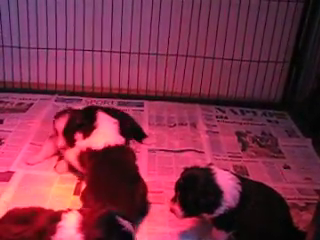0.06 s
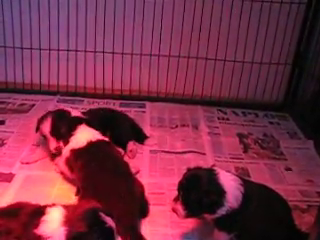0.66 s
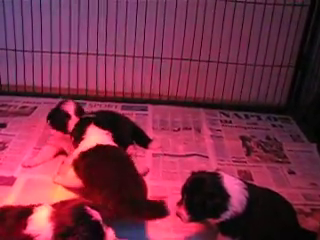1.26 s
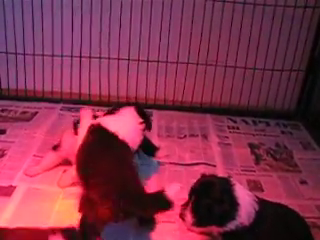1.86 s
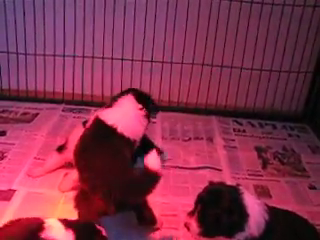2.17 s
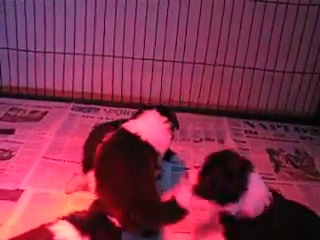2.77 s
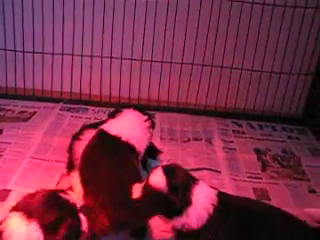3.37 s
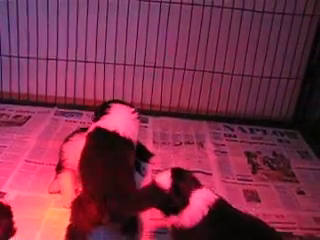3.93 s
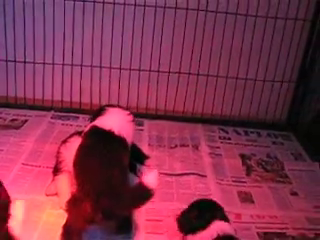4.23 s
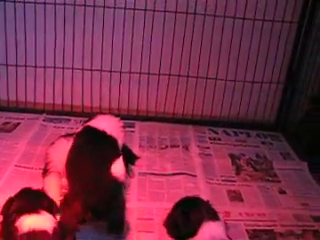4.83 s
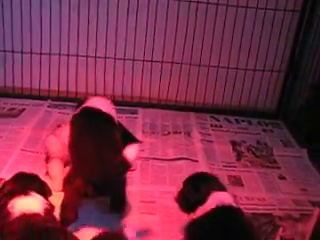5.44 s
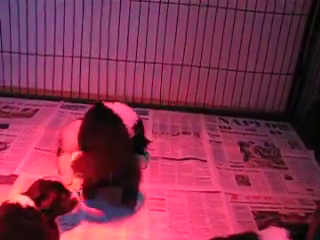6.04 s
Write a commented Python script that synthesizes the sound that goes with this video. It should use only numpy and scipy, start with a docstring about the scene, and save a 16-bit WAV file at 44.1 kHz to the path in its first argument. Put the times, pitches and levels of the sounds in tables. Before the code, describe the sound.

Newspaper rustles and crackles under puppies' paws in a crate, with a few dull tray knocks, a faint fan hum and a thin whine.

```python
"""Newspaper rustles over the faint hum of a fan and the thin whine of a camera: puppies are shuffling
in a wire crate. Sliding friction of paws and bellies makes the hiss, and creases buckle with sharp snaps.
Pads land with dull pats, small mouths smack with a brief cavity resonance, and shifting weight knocks
the tray into damped vibration. A small room adds its reverberation."""
import sys
import numpy as np
from scipy import signal
from scipy.fft import rfft, irfft, next_fast_len
from scipy.io import wavfile
from scipy.ndimage import map_coordinates

SR = 44100
rng = np.random.default_rng(int(sys.argv[2]) if len(sys.argv) > 2 else 0)


def unload_audio(sound):
    """Save the sound as a 16-bit wav file, at the path given as the first command line argument."""
    columns = np.transpose(np.atleast_2d(sound))
    # keep every value between -1 and 1, then stretch to whole-number steps
    steps = np.round(np.clip(columns, -1, 1) * 32767)
    wavfile.write(sys.argv[1], SR, steps.astype(np.int16))


N = 273402

# quick paw skids: (peak time [s], level [dB], rise [s], centre frequency [Hz])
SKIDS = [(0.457, -38.5, 0.01, 4860), (1.186, -39, .013, 7500), (2.025, -33.5, 0.025, 13500),
         (3.002, -25, 0.017, 5070), (3.099, -35, 0.023, 5200), (3.417, -26.5, 0.014, 7000),
         (4.136, -30, 0.032, 4530), (4.292, -34, 0.013, 3430), (4.49, -26, 0.0077, 9300),
         (4.535, -29.5, 0.028, 5340), (4.709, -29, 0.003, 3280), (5.397, -29.5, 0.0035, 3470),
         (5.413, -27, 0.027, 6000), (5.456, -32, 0.021, 6600), (5.745, -27.5, 0.022, 5900),
         (5.84, -32, 0.08, 5560)]
SKID_FALL = 0.96  # fall time over rise time


def amp(db):
    """Amplitude ratio of a level in decibels."""
    return 10 ** (np.asarray(db) / 20)


def unit(x):
    """Normalisation to rms 1."""
    return x / np.sqrt(np.mean(x ** 2) + 1e-20)


def along(points, hz):
    """Interpolation of (frequency [Hz], value) points on a logarithmic frequency axis."""
    freqs, values = np.transpose(points)
    return np.interp(np.log(hz + 1), np.log(freqs + 1), values)


def clock():
    """The time of every sample, in seconds."""
    return np.arange(N) / SR


def curve(points):
    """Linear interpolation of (time [s], value) points at every sample."""
    return np.interp(clock(), *np.transpose(points))


def wobble(rate):
    """Smooth random modulation of rms 1, with rate knots a second."""
    knots = rng.standard_normal(int(N * rate / SR) + 4)
    return unit(map_coordinates(knots, [clock() * rate]))


def fade(t, t60):
    """Exponential decay by 60 dB in t60."""
    return np.exp(-np.log(1000) * t / t60)


def swell(t, rise, fall):
    """Gaussian envelope of a stroke that gathers speed, peaks at t = 0 and slows."""
    return np.exp(-.5 * (t / np.where(t < 0, rise, fall)) ** 2)


def add(track, s, sound):
    """Superposition of a sound on the track from time s."""
    part = track[..., max(round(s * SR), 0):][..., :sound.shape[-1]]
    part += sound[..., :part.shape[-1]]


def filtered(x, response):
    """Linear filtering: the spectrum of x times a frequency response."""
    size = x.shape[-1]
    padded = next_fast_len(size + 2048)
    spectrum = rfft(x, padded) * response(np.fft.rfftfreq(padded, 1 / SR))
    return irfft(spectrum, padded)[..., :size]


def resonance(hz, centre_hz, q):
    """Response of two identical band-pass resonators in cascade."""
    damping = 1j * hz * centre_hz / q
    return (damping / (centre_hz ** 2 - hz ** 2 + damping)) ** 2


def stereo(pair, response):
    """Partial coherence: two independent signals become a coloured pair of rms 1, alike in the bass."""
    # likeness at the two microphone ports: (frequency [Hz], correlation [ratio])
    coherence = [(60, 0.73), (500, 0.83), (1200, 0.72), (2500, 0.49), (5000, 0.17), (9000, 0.018)]

    def mid_side(hz):
        angle = np.arccos(np.clip(along(coherence, hz), -1, 1)) / 2
        return response(hz) * np.array([np.cos(angle), np.sin(angle)])

    mid, side = filtered(pair, mid_side)
    return unit(np.array([mid + side, mid - side]))


def hiss(spectrum, size):
    """Stereo Gaussian noise shaped by a spectrum."""
    return stereo(rng.standard_normal((2, size)), lambda hz: amp(along(spectrum, hz)))


def band_noise(size, centre_hz, q):
    """Stereo Gaussian noise shaped by a resonance."""
    return stereo(rng.standard_normal((2, size)), lambda hz: resonance(hz, centre_hz, q))


def drag_levels():
    """Incoherent sources add in power: strokes and stirring set the drive [dB] of rustle, fizz and tray."""
    # restless stirring between shoves: (time [s], rustle drive [dB])
    stirring = [(0, -46), (.5, -50), (.67, -57.5), (1.0, -46), (2.2, -48), (3.3, -46.5), (4.9, -44.5),
                (5.25, -45.5), (6.2, -44.5)]
    # the tray's murmur under the litter's weight: (time [s], level [dB])
    loading = [(0.1, -48.5), (.65, -53), (.95, -49), (1.7, -50.5), (2.15, -47), (2.6, -52), (3.3, -53),
               (4.5, -50.5), (4.65, -36.5), (4.82, -51), (5.3, -55), (6.2, -51.5)]
    # body shoves: (peak time [s], rustle drive [dB], half length [s], fizz drive re rustle drive [dB])
    shoves = [(0.22, -43.5, 0.06, -6), (0.44, -46.5, 0.045, -6), (1.01, -41, 0.078, -25),
              (1.192, -42.5, 0.045, -7), (1.445, -38.5, 0.049, -3.5), (1.74, -46, .04, -3),
              (1.872, -37.5, 0.054, -8.5), (2.044, -41.5, 0.091, -21), (2.32, -47, 0.062, -4),
              (2.652, -45, 0.24, -8), (3.06, -49, 0.063, 3), (3.445, -40.5, 0.056, -2),
              (3.664, -40.5, 0.049, -5.5), (3.78, -43.5, 0.066, -20), (3.916, -39, 0.045, -6),
              (4.106, -39.5, 0.088, -9), (4.415, -35, 0.073, -6.5), (4.57, -38.5, 0.07, -10),
              (4.74, -43, 0.038, -5), (5.01, -44, 0.12, -5), (5.533, -40.5, 0.053, -3),
              (5.726, -32.5, 0.044, -7), (6.03, -41, 0.047, -3), (6.183, -45.5, .04, -3.5)]
    stir_fizz_db, shove_tray_db, skid_tray_db = -7.5, -16, -19.5  # relative to each motion's drive
    t = clock()
    rustle, tray = amp(curve(stirring)) ** 2, amp(curve(loading)) ** 2
    fizz = rustle * amp(stir_fizz_db) ** 2
    for s, db, half_s, fizz_db in shoves:
        near = np.abs(t - s) < 4 * half_s
        shove = amp(db) * swell(t[near] - s, half_s, half_s)
        rustle[near] += shove ** 2
        fizz[near] += (amp(fizz_db) * shove) ** 2
        tray[near] += (amp(shove_tray_db) * shove) ** 2
    for s, db, rise, _ in SKIDS:
        near = np.abs(t - s) < 5 * rise
        tray[near] += (amp(db + skid_tray_db) * swell(t[near] - s, rise, SKID_FALL * rise)) ** 2
    return 10 * np.log10([rustle, fizz, tray])


def fibre_friction(slips_per_s, spread_db, share):
    """Stick-slip friction: a dense hiss of paper fibres with sparse slips of very uneven size."""
    slipping = rng.random(N) < slips_per_s / SR
    slips = slipping * amp(spread_db * np.minimum(rng.exponential(size=N), 4))
    return rng.standard_normal((2, N)) + share * unit(slips * rng.standard_normal((2, N)))


def sliding(rustle_db, fizz_db, tray_db):
    """Sliding friction radiates broadband noise: paper rustles, fur fizzes and the tray murmurs below."""
    # spectra of paper, fur and tray: (frequency [Hz], relative spectral level [dB])
    paper_spectrum = [(300, -19.5), (900, -6.5), (1500, -10), (2400, -6), (4000, 2), (5500, 2.5), (7200, 2),
                      (8300, 0), (9500, -8), (12000, -24), (16000, -36)]
    fur_spectrum = [(4000, -38), (6000, 0.5), (7200, 2.5), (8500, -0.5), (10000, -0.5), (12000, 0.5),
                    (14000, -8.5), (16000, -1.5)]
    tray_spectrum = [(60, -43), (200, -10.5), (450, -11), (720, 1.5), (950, -4.5), (1400, -12), (3000, -24)]
    grip_db = 1.2 * wobble(70)  # the contact catches and lets go
    friction = fibre_friction(slips_per_s=620, spread_db=4.0, share=0.27)
    rustle = amp(rustle_db + grip_db + 2.0) * stereo(friction, lambda hz: amp(along(paper_spectrum, hz)))
    fizz = amp(fizz_db + grip_db + 9.5) * hiss(fur_spectrum, N)
    murmur = amp(tray_db + 2.0 * wobble(30)) * hiss(tray_spectrum, N)
    return rustle + fizz + murmur


def fan_hum():
    """Narrow-band noise: random amplitude and phase blur each of the fan's tones."""
    # bands of the hum: (frequency [Hz], level [dB], width [Hz])
    bands = [(414.8, -56.5, 28), (319, -76.5, 31), (634, -66, 25)]
    t, hum = clock(), 0
    for hz, db, width in bands:
        envelope = wobble(width) + 1j * wobble(width)
        hum += amp(db) * unit(np.real(envelope * np.exp(2j * np.pi * hz * t)))
    return hum


def camera_whine():
    """Steady pure tones, and one more that wanders by random frequency modulation."""
    # steady tones: (frequency [Hz], level [dB])
    tones = [(7852, -56.5), (7882, -74), (8451, -76), (8511.5, -51)]
    steady = sum(amp(db) * unit(np.sin(2 * np.pi * hz * clock())) for hz, db in tones)
    wander_hz = 9630 + 70 * wobble(15) + 45 * wobble(250)
    return steady + amp(-53.5) * unit(np.sin(2 * np.pi * np.cumsum(wander_hz) / SR))


def room_air():
    """Stationary broadband noise forms the room's ambient floor."""
    # ambient spectrum: (frequency [Hz], relative spectral level [dB])
    air_spectrum = [(20, -11), (35, -4), (55, 4), (110, 2), (220, -2.5), (400, 6), (750, -6.5),
                    (1300, -4.5), (4000, -2), (8000, -11), (10500, -1.5), (16000, -20)]
    return amp(-48.5) * hiss(air_spectrum, N)


def crinkles(rustle_db, count, spread_db, above_db):
    """Small-scale buckling: wrinkles give way at random, louder as the sheet is dragged harder."""
    out, t = np.zeros((2, N)), np.arange(SR // 50) / SR
    for when, size, pitch, life in rng.random((count, 4)):
        tick = band_noise(len(t), centre_hz=3000 * 2.6 ** pitch, q=0.54)
        db = rustle_db[int(when * N)] + above_db + spread_db * size ** 2  # most are small
        add(out, when * N / SR, amp(db) * fade(t, 0.0025 + 0.01 * life) * tick)
    return out


def crease_snaps():
    """Snap-through buckling: a crease cracks and springs back, heavily damped by the limp sheet."""
    # snapping creases: (time [s], level [dB], t60 [s], resonance frequency [Hz])
    creases = [(0.2148, -23.5, 0.0064, 3840), (0.494, -30.5, 0.044, 3880), (.999, -28, .0095, 4500),
               (1.689, -27, .02, 7500), (2.642, -25, 0.056, 10300), (2.8415, -13.5, 0.021, 5140),
               (2.9095, -7.5, 0.013, 4760), (4.1012, -9.5, 0.0036, 4800), (4.185, -16, 0.015, 4770),
               (4.3036, -21.5, 0.011, 5100), (4.376, -12, 0.018, 6900), (4.5295, -16.5, 0.0051, 4140),
               (4.587, -23.5, 0.043, 6900), (4.6448, -24.5, 0.059, 4400), (4.716, -12.5, 0.0067, 3770),
               (5.2354, -32, .02, 4100), (5.397, -8, 0.004, 4350), (5.7303, -23, 0.021, 3000),
               (5.778, 0, 0.01, 7240)]
    rebound_s, rebound_db = 0.0038, -10
    out, t = np.zeros((2, N)), np.arange(SR // 10) / SR
    for s, db, t60, centre_hz in creases:
        cutoff_hz = 1.82 * centre_hz  # limp paper dulls the top
        colour = lambda hz: resonance(hz, centre_hz, q=0.71) / (1 + (hz / cutoff_hz) ** 4)
        for start, level in ((s, db), (s + rebound_s, db + rebound_db)):
            crack = stereo(rng.standard_normal((2, len(t))), colour)
            add(out, start, amp(level) * fade(t, t60) * crack)
    return out


def paw_skids():
    """Friction noise swells and dies with a skidding paw's speed, catching as it goes."""
    out, t = np.zeros((2, N)), np.arange(-SR // 4, SR // 4) / SR
    for s, db, rise, centre_hz in SKIDS:
        stroke = swell(t, rise, SKID_FALL * rise)
        add(out, s + t[0], amp(db) * stroke * band_noise(len(t), centre_hz, q=1.02))
    return out * amp(1.4 * wobble(160))


def paw_falls():
    """Soft impacts excite little treble: pads pat the papered tray, and weight behind them adds a thud."""
    # landings: (time [s], level [dB], t60 [s], thud re pat [dB])
    landings = [(.998, -31.5, 0.065, -19), (1.072, -29, .03, -39), (2.6405, -33.5, 0.073, -17),
                (2.785, -28.5, 0.043, -25), (2.844, -25, 0.076, -10.5), (2.911, -37, 0.12, -3.5),
                (3.052, -33, 0.053, -13), (3.794, -30, 0.039, -12), (4.375, -17.5, 0.068, -13),
                (4.646, -20, 0.03, -11), (4.711, -25.5, 0.038, -12.5), (4.967, -43.5, 0.047, 6.5),
                (5.738, -34, 0.054, -18), (5.778, -27.5, 0.014, -3.5), (6.1413, -34.5, 0.024, -4)]
    # spectra of pat and thud: (frequency [Hz], relative spectral level [dB])
    pat_spectrum = [(100, -40), (350, -10), (650, 7), (900, -2), (1200, -4.5), (1800, -11.5), (4000, -16)]
    thud_spectrum = [(30, -31), (80, -17), (150, 12), (320, 11.5), (600, -26)]
    out, t = np.zeros((2, N)), np.arange(SR // 5) / SR
    attack = 1 - np.exp(-t / 0.00021)
    for s, db, t60, thud_db in landings:
        impact = hiss(pat_spectrum, len(t)) + amp(thud_db) * hiss(thud_spectrum, len(t))
        add(out, s, amp(db) * fade(t, t60) * attack * impact)
    return out


def mouth_smacks():
    """Cavity resonance: tongue and lips part with a pop and the mouth rings, settling as it opens."""
    # wet smacks: (time [s], base level [dB], t60 [s], final pitch [Hz], starting over final pitch [ratio])
    smacks = [(1.4458, -18, 0.011, 2190, 1.3), (1.672, -25.5, 0.017, 2550, 1.84),
              (2.7196, -15.5, 0.02, 2940, 1.545), (2.742, -21.5, 0.02, 2630, 0.99),
              (2.745, -19, 0.021, 2700, 1.15), (3.2135, -27, 0.025, 2110, 1.5),
              (3.4956, -20, 0.021, 2130, 1.65), (3.8016, -31.5, 0.048, 2560, 1.14),
              (3.81, -21, 0.019, 3080, 1.57)]
    port_phase, port_db = np.array([[0], [.18]]), [[-1.2], [1.2]]  # left, right; phase in cycles
    out, t = np.zeros((2, N)), np.arange(SR // 10) / SR
    attack = 1 - np.exp(-(t / 0.0004) ** 2)
    for s, db, t60, pitch_hz, start_ratio in smacks:
        glide_hz = pitch_hz * (1 + (start_ratio - 1) * np.exp(-t / 0.0011))
        cavity = np.sin(2 * np.pi * (np.cumsum(glide_hz) / SR + port_phase))
        pop = (2.3 * fade(t, 0.22 * t60) + 0.4 * fade(t, t60)) * attack
        wet = 0.72 * fade(t, t60) * band_noise(len(t), 1.12 * pitch_hz, q=1.8)
        add(out, s, amp(db) * (pop * cavity + wet))
    return out * amp(port_db)


def tray_knocks():
    """Damped modal vibration: the tray flexes against the floor; only heavy blows reach its low modes."""
    # blows from shifting weight: (time [s], level [dB], t60 scale [ratio], frequency scale [ratio])
    blows = [(1.9271, -14, 0.84, 1.02), (2.372, -23.5, 0.42, 1.36), (4.3742, -3, 0.7, 0.97),
             (4.3803, -14.5, 2.4, 1.102), (4.5855, -19, 1.17, 1.16)]
    # the tray's modes: (base frequency [Hz], relative level [dB], base t60 [s])
    modes = [(336, -6, 0.02), (553, 5.5, 0.015), (669, 5, 0.019), (820, -5.5, 0.024)]
    flex = 0.91  # dB lost per octave below the strongest mode, for each dB that the blow is lighter
    baffle_hz, padding_hz = 290, 1200  # the thin tray radiates little bass; paper softens the contact
    out, t = np.zeros((2, N)), np.arange(SR // 5) / SR
    attack = 1 - np.exp(-(t / 0.0011) ** 2)
    main_hz = max(modes, key=lambda mode: mode[1])[0]
    for s, db, ring, pitch in blows:
        knock = 0
        for hz, level, t60 in modes:
            flex_db = flex * db * max(np.log2(main_hz / hz), 0)
            gain = amp(level + flex_db + rng.normal(0, 1))
            knock += gain * fade(t, t60 * ring) * np.sin(2 * np.pi * hz * pitch * t)
        add(out, s, amp(db) * knock * attack)
    return signal.sosfilt(signal.butter(2, [baffle_hz, padding_hz], "band", fs=SR, output="sos"), out)


def reverberation(x):
    """The room's diffuse field decays exponentially, fastest in the high treble."""
    # reverberation times: (frequency [Hz], t60 [s])
    decay_times = [(150, 0.26), (700, 0.37), (3000, 0.35), (12000, 0.2)]
    noise = stereo(rng.standard_normal((2, SR // 2)), np.ones_like)
    hz, t, bands = signal.stft(noise, SR, nperseg=256)
    tail = signal.istft(bands * fade(t, along(decay_times, hz)[:, None]), SR, nperseg=256)[1]
    tail_s = np.arange(tail.shape[1]) / SR
    tail *= 1 - np.exp(-(tail_s / 0.0014) ** 2)  # the walls take a moment to reply
    return signal.fftconvolve(x, tail / np.linalg.norm(tail[0]), axes=1)[:, :N]


def scene():
    """Superposition of the crate's direct sound, the reverberation of its transients and the background."""
    rustle_db, fizz_db, tray_db = drag_levels()
    paper = paw_skids() + crease_snaps() + paw_falls()
    paper += crinkles(rustle_db, count=130, spread_db=2.0, above_db=8.5)
    mouths, tray = mouth_smacks(), tray_knocks()
    reverb = reverberation(amp(-7.5) * paper + amp(-4) * mouths + amp(-5.5) * tray)
    bodies = sliding(rustle_db, fizz_db, tray_db)
    background = fan_hum() + camera_whine() + room_air()
    return bodies + paper + mouths + tray + reverb + background


def record(dry):
    """Transduction: each microphone port colours the sound; peaks clip and the top band is cut."""
    # response common to both ports: (frequency [Hz], gain [dB])
    response = [(8000, 0.5), (11000, -7.5), (14000, -3), (16000, -12)]
    # difference in colour between the ports: (frequency [Hz], left minus right [dB])
    imbalance = [(100, -0.5), (400, -5.5), (750, -3), (1300, -1.5), (2500, -3), (4400, -2.5), (6500, 2.5),
                 (8000, -7), (9000, -7.5), (10000, -7.5), (11500, 9), (15000, 0.5)]
    split, top_hz = np.array([[.5], [-.5]]), 15800
    heard = filtered(dry, lambda hz: amp(along(response, hz) + split * along(imbalance, hz)))
    return filtered(np.clip(heard, -1, 1), lambda hz: hz < top_hz)


dry = scene()
out = record(dry)
unload_audio(out)
```